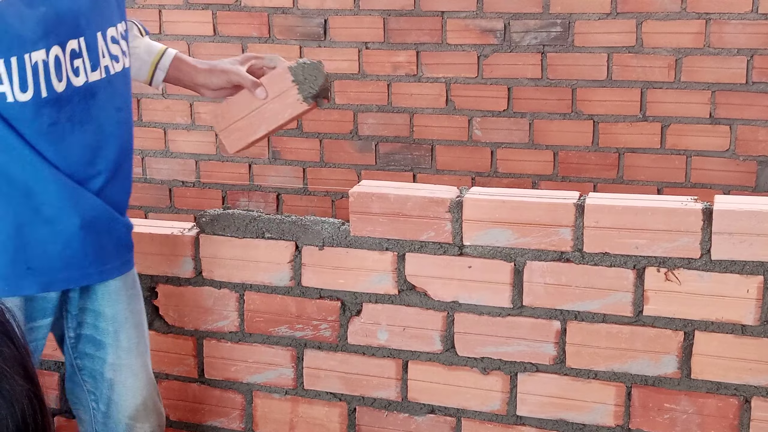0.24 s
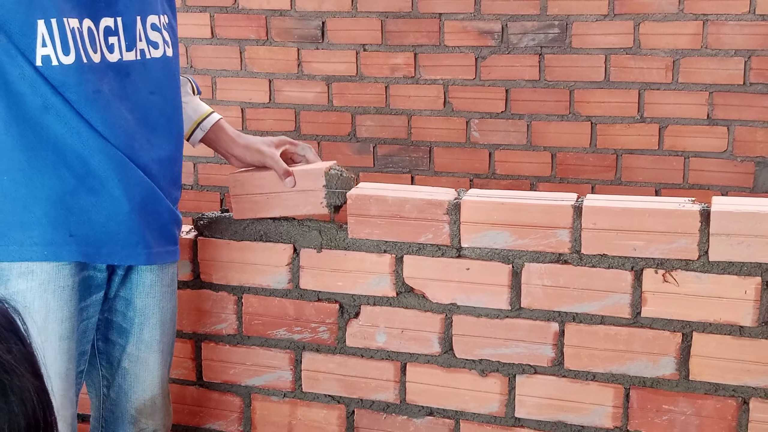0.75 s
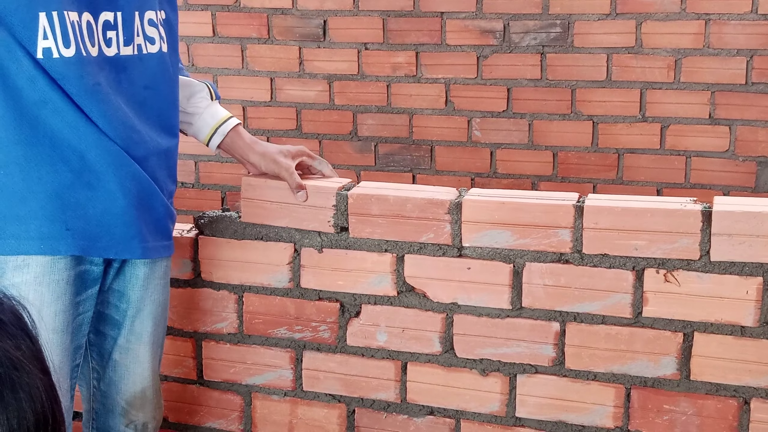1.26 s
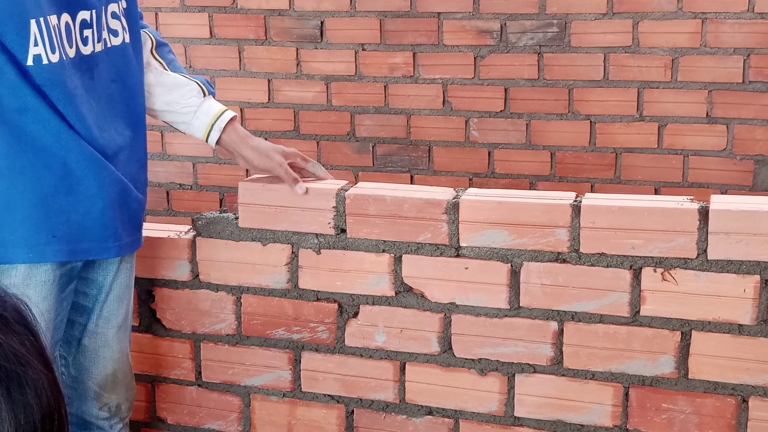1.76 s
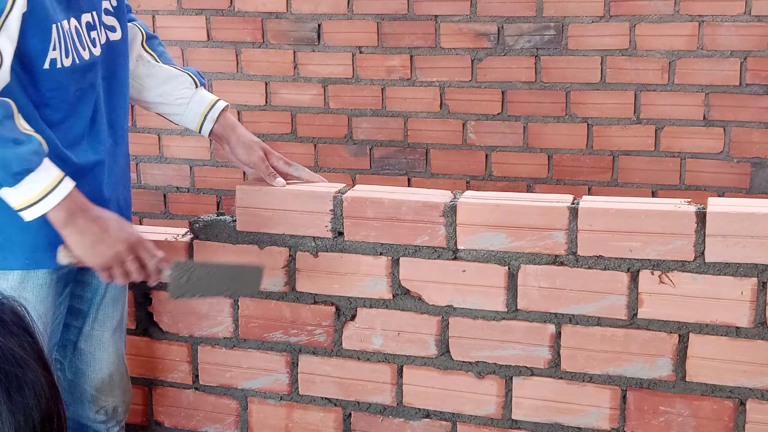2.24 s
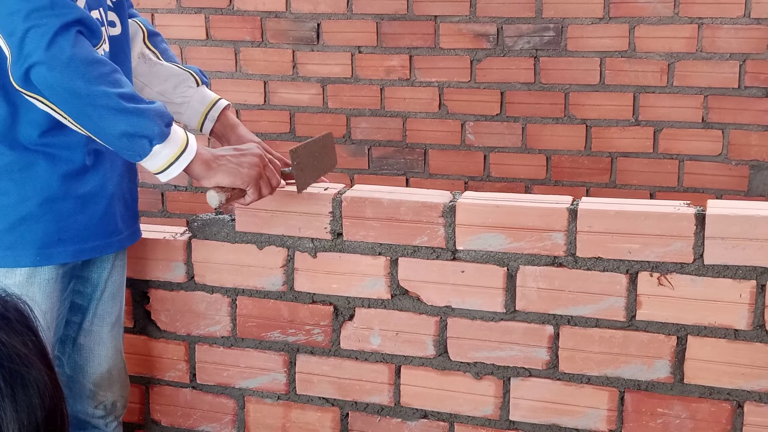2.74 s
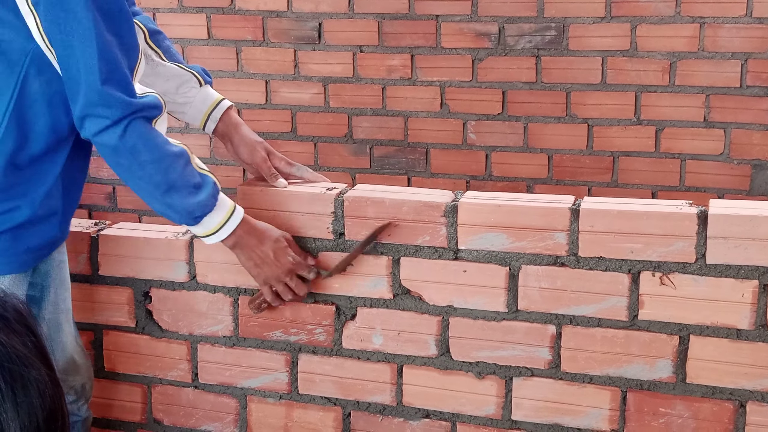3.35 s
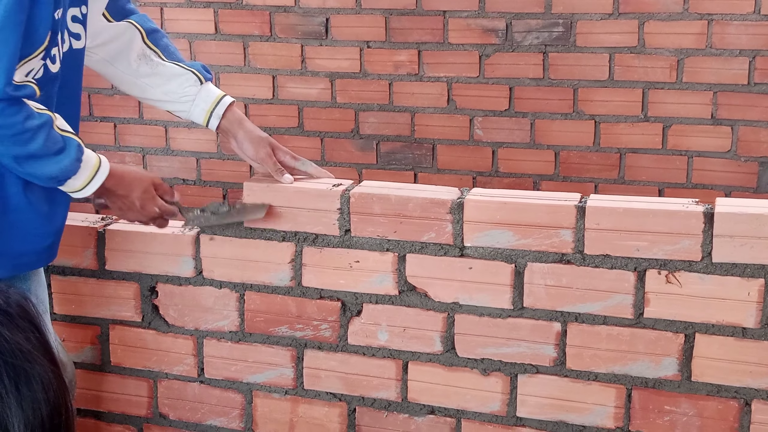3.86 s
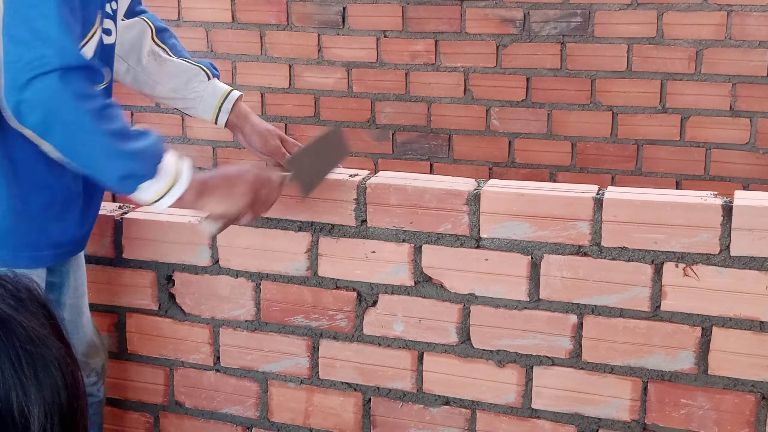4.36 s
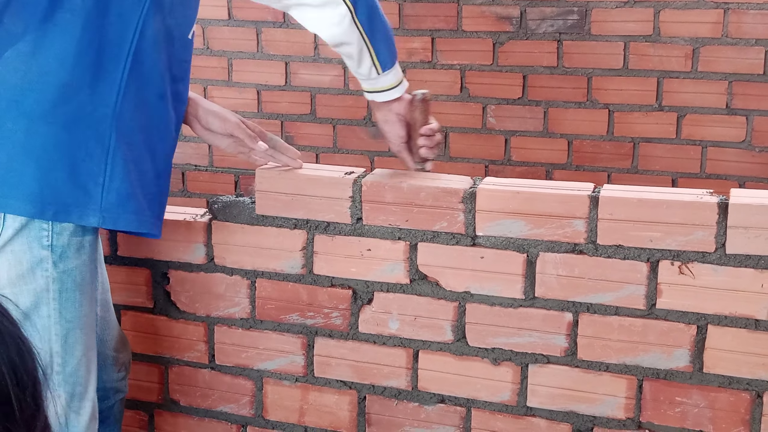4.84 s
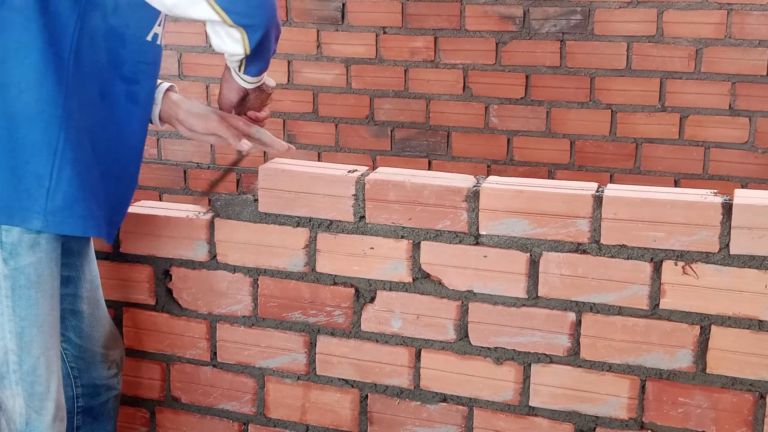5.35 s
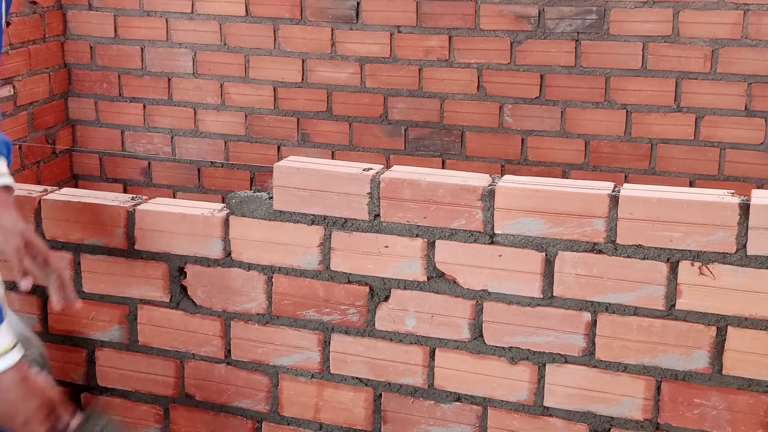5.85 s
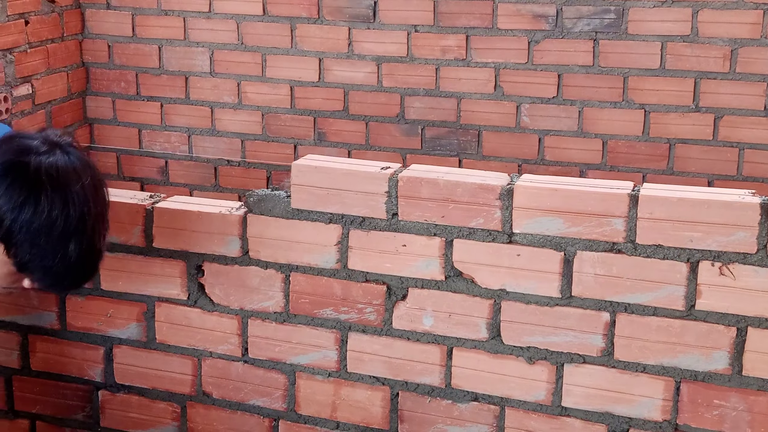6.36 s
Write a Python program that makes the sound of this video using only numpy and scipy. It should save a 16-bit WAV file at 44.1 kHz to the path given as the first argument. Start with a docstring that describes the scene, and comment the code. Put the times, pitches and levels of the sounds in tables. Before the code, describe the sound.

Bricklaying up close: sharp metallic trowel knocks with short rings, gritty brick and mortar scraping, a faint bird, and a closing tub thud.

```python
"""Steel trowels chop and clink on hollow clay bricks: bursts of tiny cracks, then a fading metal ring.
Blades and bricks also scrape gritty mortar, crumbs and dull wall knocks crackle, and a mortar tub thuds.
Grains, noise and tones are shaped by filters; bare brick walls give many of the sounds a short echo.
A bird whistles faintly, thin squeaks and one tiny tick are heard, and dull bumps and a deep rumble lie
under the site's steady air."""
import sys
import numpy as np
from scipy import signal
from scipy.fft import rfft, irfft
from scipy.io import wavfile
from scipy.ndimage import uniform_filter1d, map_coordinates

SR = 44100
rng = np.random.default_rng(int(sys.argv[2]) if len(sys.argv) > 2 else 0)


def master_out(mix):
    """Clip the mix to full scale and print it as 16-bit PCM to the path in sys.argv[1]."""
    frames = np.transpose(np.atleast_2d(mix))
    ceiling = np.clip(frames, -1, 1)
    pcm = np.round(ceiling * 32767).astype(np.int16)
    wavfile.write(sys.argv[1], SR, pcm)


N = 291060
T = np.arange(N) / SR  # time of every sample (s)

# tone colour of blade or brick rasping on grit: f/Hz, relative level/dB
RASP_COLOUR = [(300, -39.5), (800, -14), (1200, -6.5), (1800, 0), (2600, -5.5), (3000, -5), (3600, -12),
               (4300, -33), (6000, -41), (9000, -64)]
# tone colour of squashed wet mortar: f/Hz, relative level/dB
WET_COLOUR = [(80, -24.5), (210, -4), (340, 0.5), (580, 2), (860, 1.5), (1300, -10), (3000, -63)]
# tone colour of hissing sand: f/Hz, relative level/dB
SAND_COLOUR = [(2500, -22), (4500, 6), (6800, 2), (8500, -0.5), (10300, -5), (12500, 1), (15500, 5.5)]


def blows():
    """A blade crushes into the clay in a short burst of cracks, and the steel rings on."""
    # trowel blows: t/s, crunch length/s, clay clack level/dB, brightness/(dB per octave),
    # ring level/dB, kind of strike, by one trowel or another
    blow_list = [(-.014, 0.054, -25, -2.5, -32.5, "edge"), (0.598, 0.044, -41.5, -13, -73, "tip"),
                 (0.727, 0.036, -38, -6.5, -33.5, "tip"), (0.768, 0.058, -35, -10, -48, "tip"),
                 (1.189, 0.05, -45, -14, -56.5, "point"), (1.958, 0.019, -46.5, -11.5, -80, "tip"),
                 (2.729, 0.05, -23, -2.5, -43, "edge"), (3.281, 0.029, -56, -15, -88, "tip"),
                 (3.971, 0.024, -50, -25, -88, "edge"), (4.246, 0.036, -20, 8.5, -26, "flat"),
                 (4.782, 0.064, -45.5, 17, -65, "heel"), (5.29, 0.029, -20.5, 4.5, -22.5, "heel"),
                 (5.326, 0.01, -25.5, -6, -29.5, "heel"), (6.064, 0.018, -46.5, -8, -61.5, "edge")]
    # names of the kinds of strike, in the order of the level columns below
    strike_names = ["edge", "flat", "heel", "tip", "point"]
    # steel blade and brick ringing together: f/Hz, 60 dB fade time of the lingering ring/s,
    # then the relative level/dB for the strikes named edge, flat, heel, tip, point
    blade_modes = [(1450, .4, -7, -19, -19, -10, -14), (1690, .42, -3, -16, -21, -12, -12),
                   (1900, .42, -3, -15, -12, -12, -16), (2030, .45, -4, -12, -11, -7, -12),
                   (2200, .48, -9, -6, -6, -6, -12), (2400, .42, -3, -6, -14, -8, -12),
                   (2720, .42, -1, -7, -12, -14, -10), (3590, .36, -9, -4, -7, -25, -30),
                   (3692, .68, 0, -22, -22, -22, -25), (3829, .55, -25, 1, 0, -30, -30),
                   (4062, .4, -19, -22, -19, 1, -14), (4318, .58, -9, -3, -20, -28, -30),
                   (4512, .4, -14, -18, -30, -1, -12), (4600, .42, -15, -7, -20, -22, -8),
                   (4920, .38, -10, -30, -34, -32, -30), (5255, .42, -17, -34, -38, -14, 0),
                   (5550, .45, -36, -19, -16, -32, -26), (5820, .18, -42, -25, -32, -36, -30),
                   (6436, .3, -38, -31, -34, -38, -38), (6810, .22, -38, -46, -50, -28, -32),
                   (8558, .33, -36, -30, -36, -40, -36), (9195, .26, -35, -29, -48, -32, -34),
                   (10230, .25, -50, -46, -45, -26, -24), (10870, .28, -54, -33, -42, -30, -34),
                   (11650, .16, -58, -40, -48, -42, -48), (12950, .2, -60, -42, -50, -46, -52),
                   (7180, .4, -36, -55, -50, -50, -50), (15400, .18, -60, -50, -55, -27, -45)]
    # tone colour of hollow clay brick: f/Hz, relative level/dB
    clay_colour = [(100, -29), (400, -23), (800, -25), (1150, -13.5), (1550, -0.5), (2300, 5), (3100, -3),
                   (3650, -1), (4400, -20), (5200, -24), (6300, -41.5), (9000, -56.5), (15000, -54)]

    clay, steel = np.zeros(N), np.zeros(N)
    # the hand soon damps the strong first clink; a weaker ring lingers
    damping = undb(-5) + undb(1.5) * fade(T[:SR], 0.19)
    t = T[:SR // 5]
    for s, length, clack_db, bright_db, ring_db, strike in blow_list:
        envelope = np.sin(np.pi * np.minimum(t / length, 1)) ** 2
        crunch = grit(len(t), 3000, 4.6) * envelope
        # same average power in every crunch, whatever its length
        crunch *= np.sqrt(length * SR / np.sum(crunch ** 2))
        add(clay, s, undb(clack_db) * colour(crunch, clay_colour, bright_db))

        column = strike_names.index(strike)
        for hz, t60, *strike_dbs in blade_modes:
            tone = ring(hz, t60, 0.73 * length, waver=1.0)
            add(steel, s, undb(ring_db + strike_dbs[column]) * damping * tone)
    hollow_clay = body(clay, t60=0.031, depth_db=-9)
    return room(hollow_clay, wet_db=1.5, t60=0.49, treble_t60=0.14) + steel


def scrapes():
    """Grains catch under the moving blade: the brick rasps, wet mortar squashes, sand hisses."""
    # strokes of blade or brick through mortar; in order, the brick is lowered and bedded, the joint
    # is cleaned, the top is scraped, and the trowel digs in the tub:
    # t/s, rise/s, hold/s, relative levels of rasp/dB, wet mortar/dB, sand hiss/dB
    strokes = [(0.273, 0.095, 0.066, -53.5, -51, -86), (0.5, 0.049, 0.16, -50.5, -60, -79),
               (0.717, 0.0099, 0.12, -43, -47, -69), (1.165, 0.11, 0.24, -56, -54, -89),
               (1.52, 0.11, 0.027, -37, -51.5, -66.5), (2.56, 0.087, 0.073, -54, -72, -92),
               (3.27, 0.0075, 0.14, -54, -75, -91), (3.392, 0.025, 0.013, -47.5, -71, -69),
               (3.443, 0.044, 0.14, -41.5, -53.5, -61), (3.611, 0.0093, 0.11, -43.5, -50.5, -65.5),
               (3.861, 0.081, 0.032, -54.5, -66, -77), (4.774, .025, 0.041, -51, -85, -63.5),
               (4.865, 0.11, 0.15, -35, -53, -56), (5.132, 0.05, 0.19, -38.5, -58, -66),
               (5.986, 0.056, 0.039, -52, -78, -69), (6.085, 0.08, 0.042, -32, -46.5, -65),
               (6.425, 0.04, 0.037, -38, -41.5, -74), (6.533, 0.039, .04, -28.5, -27, -73)]
    # resonances of the blade while pressed on the wall: f/Hz, width/Hz, relative level/dB
    pressed_modes = [(1420, 130, -3), (1760, 110, -2), (2030, 90, 0), (2450, 140, -5), (2760, 160, -7),
                     (3320, 220, -7), (3800, 160, -8), (4620, 140, -24), (5900, 180, -27), (7020, 160, -23)]

    catching = unit(undb(2.2 * walk(60)))
    # coarse stones snag now and then and crack in rasp, wet mortar and sand at once
    stones = .5 * grit(N, 90, 2)
    rasp = undb(-4.5) * colour(grit(N, 1200, 4.6) + stones, RASP_COLOUR)
    rasp += undb(-6.5) * resonate(grit(N, 830, 5.9), pressed_modes)
    wet = colour(grit(N, 1000, 0.93) + stones, WET_COLOUR)
    sand = undb(0.5) * colour(grit(N, 2800, 3.2) + stones, SAND_COLOUR)
    out = np.zeros(N)
    for s, rise, hold, rasp_db, wet_db, hiss_db in strokes:
        mixture = undb(rasp_db) * rasp + undb(wet_db) * wet + undb(hiss_db) * sand
        out += push(s, rise, hold) * catching * mixture
    return room(body(out, t60=0.019, depth_db=-2.0), wet_db=-3.5, t60=0.34, treble_t60=0.052)


def drag():
    """The steel edge, drawn hard along a brick, sticks and slips and keeps a few resonances singing."""
    # pressure of the edge on the brick: t/s, relative level/dB
    pressure = [(4.88, -61), (4.946, -38), (4.972, -47), (5.02, -30.5), (5.074, -37.5), (5.096, -31),
                (5.28, -39.5)]
    # resonances it excites: f/Hz, width/Hz, relative level/dB
    singing_modes = [(970, 90, -14), (1430, 150, -4), (2045, 90, 1), (2610, 220, -5), (3300, 300, -8),
                     (3650, 280, -8)]

    times, levels_db = np.transpose(pressure)
    singing = resonate(grit(N, 1500, 2.5), singing_modes)
    return undb(0.5) * singing * swell(times, levels_db)


def pats():
    """Mortar crumbs and dabs land, and hard blows knock dully on the wall: short noise crackles."""
    # landings and wall knocks: t/s, relative levels of mid knock/dB, low body/dB, crisp top/dB
    pat_list = [(.268, -48, -82, -63), (1.335, -56, -45.5, -85), (2.884, -33.5, -55, -48.5),
                (2.995, -52, -83, -56.5), (3.428, -68, -75, -61), (3.616, -45, -43.5, -59),
                (4.274, -31.5, -52, -72), (4.521, -77, -80, -64), (4.941, -48, -60, -63.5),
                (5.082, -49, -67, -47.5), (5.315, -54.5, -40.5, -61), (6.338, -28.5, -34.5, -50),
                (6.485, -33.5, -37, -68), (6.513, -36.5, -63, -74), (6.531, -30.5, -38.5, -74)]

    out, t = np.zeros(N), T[:SR // 8]
    for s, *dbs in pat_list:
        for db, spectrum in zip(dbs, (RASP_COLOUR, WET_COLOUR, SAND_COLOUR)):
            crackle = rng.standard_normal(len(t)) * fade(t, .035)
            add(out, s, undb(db + 9.0) * colour(crackle, spectrum))
    return room(out, wet_db=1, t60=0.4, treble_t60=0.16)


def tub():
    """The trowel lands in the mortar tub, whose walls thud in several fading low tones."""
    # ringing tones of the tub: f/Hz, relative level/dB, 60 dB fade time/s
    tub_modes = [(193, -14, 0.46), (283, -6.5, 0.4), (421, 2, 0.3), (475, 3.5, 0.21), (570, -17, 0.097),
                 (680, -11, 0.34), (900, -30, 0.25)]
    landing_s, level_db = 6.334, -26.5

    out = np.zeros(N)
    for hz, db, t60 in tub_modes:
        add(out, landing_s, undb(level_db + db) * ring(hz, t60, 0.0044, waver=0.85))
    return out


def squeaks():
    """Faint squeaks, lingering tones and one tiny high tick, all gliding tones blurred by the walls."""
    # thin tones and the tick: t/s, length/s, start f/Hz, end f/Hz, relative level/dB
    squeak_list = [(0.461, 0.29, 990, 1058, -60.5), (0.586, 0.19, 1358, 1321, -55),
                   (0.896, 0.3, 1354, 1266, -62), (0.911, 0.24, 1760, 1740, -63),
                   (5.5, 0.092, 1190, 1037, -62.5), (6.132, 0.0058, 12100, 11800, -53)]

    out = np.zeros(N)
    for s, length, start_hz, end_hz, db in squeak_list:
        add(out, s, undb(db + 8) * whistle(length, start_hz, end_hz, waver=1.63))
    return room(out, wet_db=-8.5, t60=0.66, treble_t60=.12)


def bird():
    """Evenly paced calls: each is two quick downward whistles, then a lower falling note."""
    first_s, interval_s, count = .222, .299, 15
    level_db, spread_db = -64, 1.5  # the spread is how much calls differ in loudness
    # parts of a call: delay (s), length (s), start and end pitch (Hz) before each call's random shift
    notes = [(0, 0.037, 5100, 2890), (.038, 0.038, 5250, 3050), (.075, 0.044, 2950, 2570)]

    out = np.zeros(N)
    for k in range(count):
        s = first_s + k * interval_s
        db = level_db + spread_db * rng.standard_normal()
        pitch = 1 + 0.0282 * rng.standard_normal()
        for lag, length, start_hz, end_hz in notes:
            add(out, s + lag, undb(db) * whistle(length, pitch * start_hz, pitch * end_hz, waver=.6))
    # the microphone dulls the high start of each whistle
    out = signal.sosfilt(signal.butter(4, 3800, fs=SR, output="sos"), out)
    return room(out, wet_db=-17, t60=0.31, treble_t60=.3)


def site():
    """Filtered noise makes steady outdoor air, dull bumps between the walls and a deep rumble."""
    # tone colour of the air: f/Hz, relative level/dB
    air_colour = [(22, -24.5), (38, -43), (92, -6), (130, -1.5), (244, -9), (356, -7), (494, -9.5),
                  (838, -13.5), (1050, -12.5), (1390, -13), (2730, -8), (3100, -13), (4870, -29.5),
                  (5390, -35.5), (15500, -49.5)]
    # dull bumps, loud and faint: t/s, length/s, level/dB
    bump_list = [(.38, 0.12, -52), (0.514, .11, -46), (0.772, .1, -43.5), (0.855, 0.27, -51),
                 (1.284, 0.1, -42), (1.374, .13, -43.5), (1.61, .08, -51.5), (3.418, 0.14, -55),
                 (3.712, .14, -52), (4.928, 0.073, -52), (5.06, .17, -69), (6.32, 0.2, -43)]
    # tone colour of bumps and shuffling: f/Hz, relative level/dB
    boom_colour = [(50, -51), (95, -4), (125, 7), (150, 2), (190, -5.5), (300, -14.5), (600, -61)]
    # tone colour of the rumble: f/Hz, relative level/dB
    deep_colour = [(20, -57), (33, -38), (44, 4), (54, -6.5), (80, -2), (200, -54.5)]

    air_db = -59 + 1.0 * walk(4.72)
    air = undb(air_db) * colour(rng.standard_normal(N), air_colour)

    # faint shuffling goes on under and between the bumps
    shuffle_db = -65.5 + 3 * walk(15)
    bump_gain = undb(shuffle_db)
    for s, length, db in bump_list:
        add(bump_gain, s, undb(db) * np.hanning(int(length * SR)))
    bumps = bump_gain * colour(rng.standard_normal(N), boom_colour)

    # the rumble swells once over its resting level
    rumble_gain = undb(-70.5) + undb(-63) * push(3.57, rise=0.05, hold=0.77)
    rumble = rumble_gain * colour(rng.standard_normal(N), deep_colour)
    return air + bumps + rumble


def room(x, wet_db, t60, treble_t60):
    """Direct sound, then dense echoes off the brick walls, with a separate fade time for the treble."""
    t = T[:SR * 3 // 4]
    echoes = grit(len(t), 7000, 2.6)
    low = signal.sosfilt(signal.butter(4, 5000, fs=SR, output="sos"), echoes)
    high = signal.sosfilt(signal.butter(4, 5000, "high", fs=SR, output="sos"), echoes)
    # no echo arrives in the first 4 ms
    tail = (low * fade(t, t60) + high * fade(t, treble_t60)) * (t > .004)
    response = undb(wet_db) * tail / np.linalg.norm(echoes * fade(t, t60))
    response[0] = 1
    return signal.oaconvolve(x, response / np.sqrt(1 + undb(2 * wet_db)))[:len(x)]


def body(x, t60, depth_db):
    """Waves bouncing inside a hollow brick ripple the spectrum with many close resonances."""
    t = T[:SR // 25]
    response = rng.standard_normal(len(t)) * fade(t, t60)
    response *= undb(depth_db) / np.linalg.norm(response)
    response[0] += 1  # the direct sound
    return signal.oaconvolve(x, response / np.linalg.norm(response))[:len(x)]


def resonate(x, modes):
    """Resonances (Hz, width in Hz, dB) that drift as the contact point moves along the blade."""
    out = 0
    for hz, width, db in modes:
        b, a = signal.iirpeak(hz, hz / width, fs=SR)
        tone = signal.lfilter(b, a, signal.lfilter(b, a, x))
        out = out + undb(db + 2 * walk(18)) * unit(tone)
    # reading the sound slightly faster or slower shifts every pitch together
    place = np.cumsum(1 + .014 * walk(16))
    return unit(map_coordinates(out, [place], order=3, mode="mirror"))


def ring(hz, t60, rise, waver):
    """One fading tone of a struck object; reflections make its level and phase waver."""
    t = T[:SR]
    phase = 2 * np.pi * hz * t + waver * wander(t, 60)
    beating = unit(undb(4 * wander(t, 70)))
    envelope = np.minimum(t / rise, 1) * fade(np.maximum(t - rise, 0), t60)
    return np.sqrt(2) * envelope * beating * np.sin(phase)


def whistle(length, start_hz, end_hz, waver):
    """A gliding tone; waver blurs its pitch while random level changes break it up."""
    t = T[:int(length * SR)]
    u = t / length
    # average of a straight glide and an S-shaped one
    glide = (u + np.sin(np.pi * u / 2) ** 2) / 2
    hz = start_hz + (end_hz - start_hz) * glide
    strength = np.sqrt(np.sin(np.pi * u)) * unit(undb(5.8 * wander(t, 68.7)))
    phase = 2 * np.pi * np.cumsum(hz) / SR + waver * wander(t, 110)
    return strength * np.sin(phase)


def grit(count, rate, spread_db):
    """Sand grains crack at random, about rate a second: many small, a few large."""
    sizes = undb(spread_db * np.minimum(rng.exponential(size=count), 4))
    cracks = rng.random(count) < rate / SR
    return unit(cracks * sizes * rng.choice([-1, 1], count))


def colour(x, points, tilt_db=0):
    """Filter noise through (Hz, dB) points, tilted in dB per octave within an octave of 2 kHz."""
    size = 4096
    hz, db = np.transpose(points)
    octave = np.log2(np.maximum(np.arange(size // 2 + 1), .5) * SR / size)
    tilt = tilt_db * np.clip(octave - np.log2(2000), -1, 1)
    gain = undb(np.interp(octave, np.log2(hz), db) + tilt)
    # folding the cepstrum makes the filter respond at once, with nothing before the sound
    cepstrum = irfft(np.log(gain))
    cepstrum[1:size // 2] *= 2
    cepstrum[size // 2 + 1:] = 0
    response = irfft(np.exp(rfft(cepstrum)))
    return signal.oaconvolve(x, response / np.linalg.norm(response))[:len(x)]


def push(s, rise, hold):
    """Effort of one movement: it builds up, holds, and dies away once the hand eases off."""
    release_t60 = 0.27  # s
    build_up = np.clip((T - s) / rise, 0, 1) ** 2
    return build_up * fade(np.maximum(T - s - rise - hold, 0), release_t60)


def swell(s, db, edge=0.06):
    """Gain along a level curve in dB, with short ramps (s) to silence outside it."""
    ramps = np.interp(T, [s[0] - edge, s[0], s[-1], s[-1] + edge], [0, 1, 1, 0])
    return undb(np.interp(T, s, db)) * ramps


def walk(rate):
    """Slow random drift with rms near 1, taking a new value rate times a second."""
    k = int(SR / rate)
    steps = np.repeat(rng.standard_normal(N // k + 1), k)
    return unit(uniform_filter1d(steps, k))[:N]


def wander(t, rate):
    """Random values joined by straight lines, rate of them a second."""
    return np.interp(t * rate, np.arange(400), rng.standard_normal(400))


def fade(t, t60):
    """Exponential decay that falls by 60 dB in t60 seconds."""
    return np.exp(-np.log(1000) * t / t60)


def undb(db):
    """Decibels to gain."""
    return 10 ** (np.asarray(db) / 20)


def unit(x):
    """Scale to rms 1."""
    return x / np.sqrt(np.mean(x ** 2) + 1e-20)


def add(out, s, x):
    """Mix x into out at time s, dropping what lies outside the scene."""
    i = int(s * SR)
    x, i = x[max(-i, 0):], max(i, 0)
    out[i:i + len(x)] += x[:N - i]


def scene():
    """All the work and its surroundings, heard from one place."""
    work = blows() + scrapes() + drag() + pats() + tub() + squeaks()
    return (work + bird() + site())[None]


def record(dry):
    """The microphone cuts the deepest bass and the very top."""
    dry = signal.sosfilt(signal.butter(8, 37, "high", fs=SR, output="sos"), dry)
    return signal.sosfilt(signal.ellip(10, .2, 70, 15800, fs=SR, output="sos"), dry)


dry = scene()
out = record(dry)
master_out(out)
```